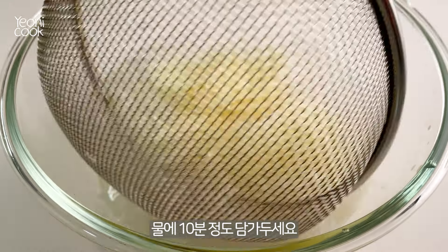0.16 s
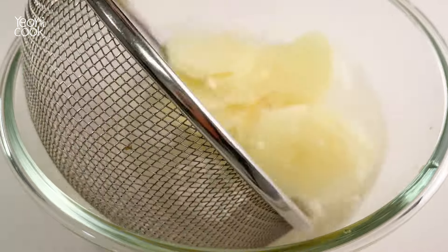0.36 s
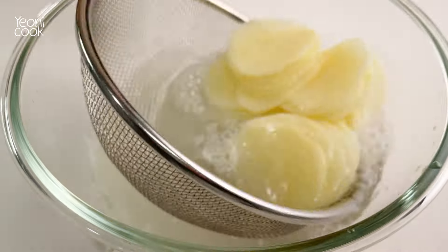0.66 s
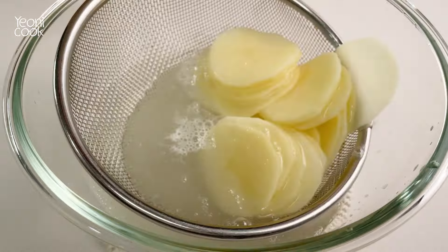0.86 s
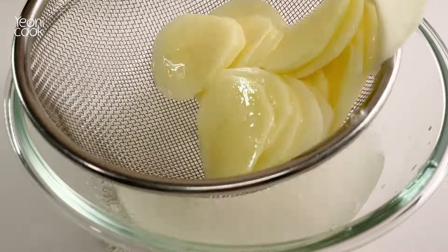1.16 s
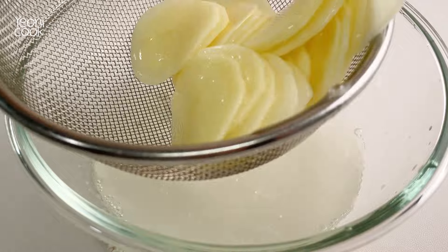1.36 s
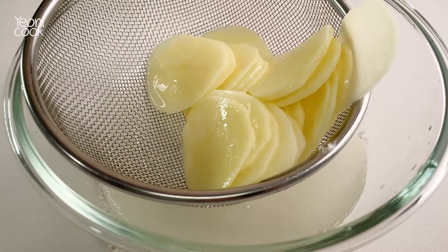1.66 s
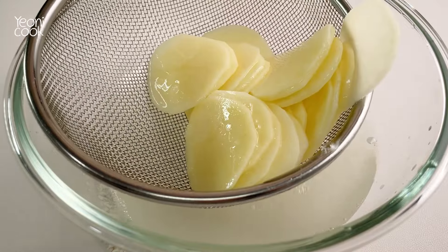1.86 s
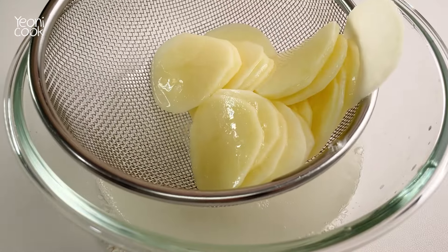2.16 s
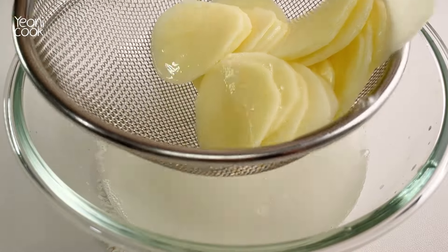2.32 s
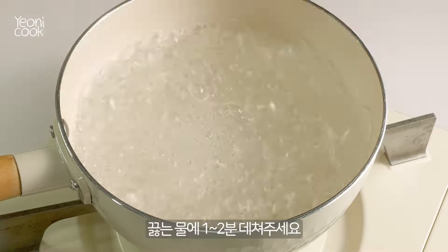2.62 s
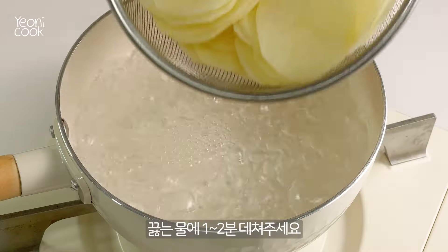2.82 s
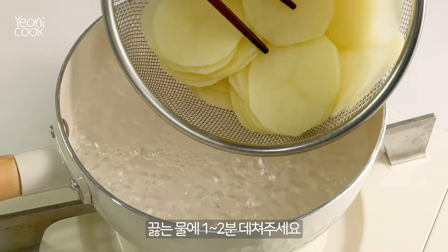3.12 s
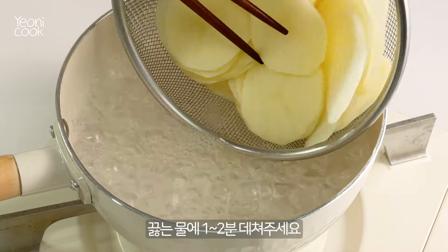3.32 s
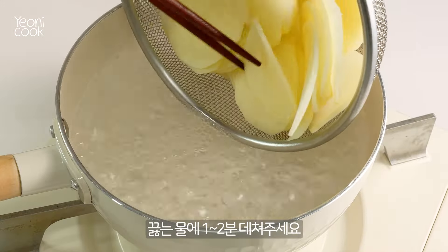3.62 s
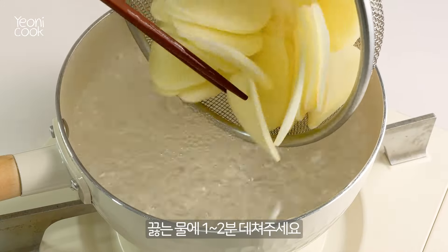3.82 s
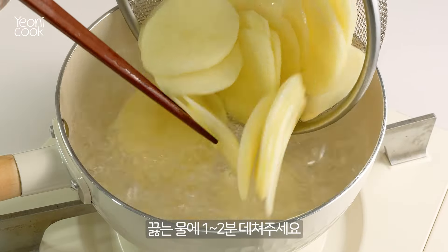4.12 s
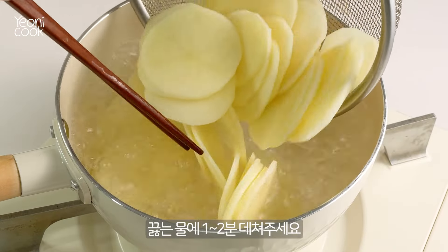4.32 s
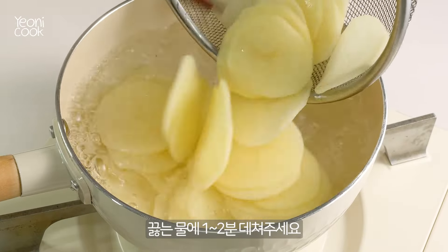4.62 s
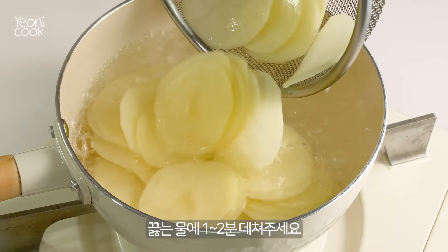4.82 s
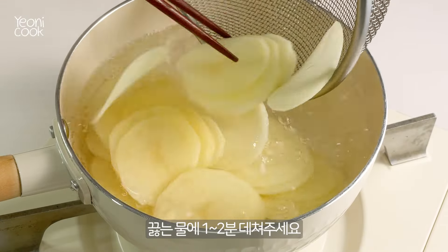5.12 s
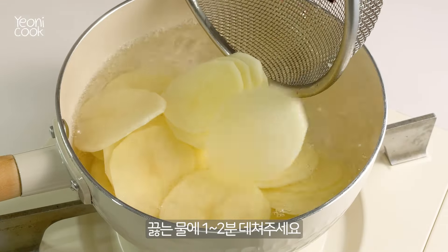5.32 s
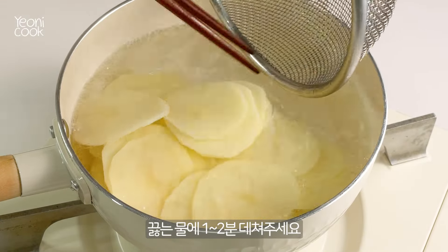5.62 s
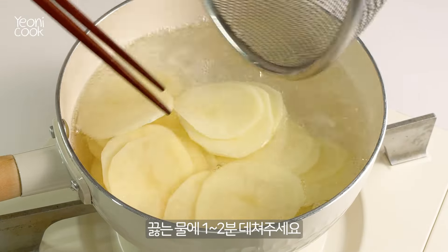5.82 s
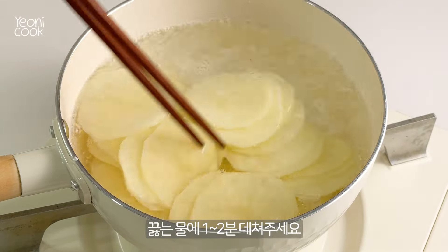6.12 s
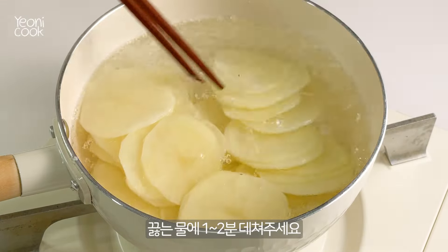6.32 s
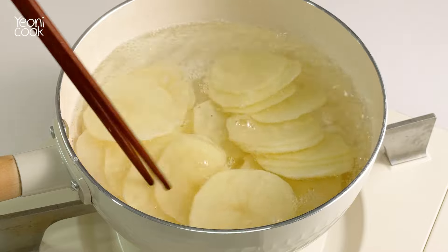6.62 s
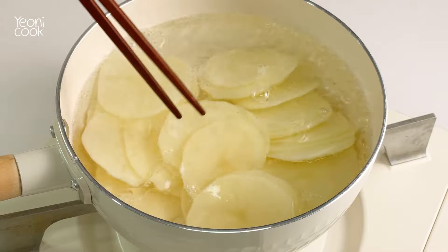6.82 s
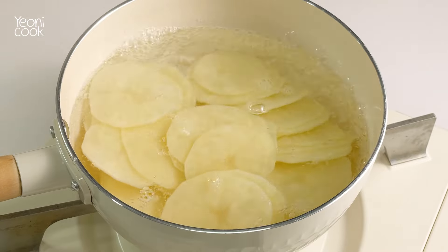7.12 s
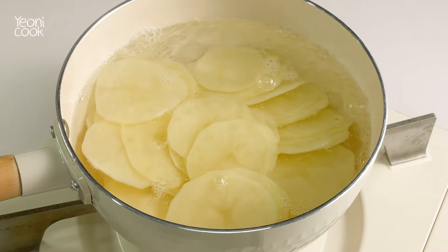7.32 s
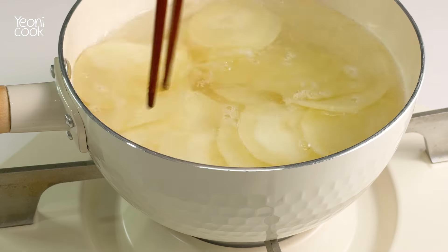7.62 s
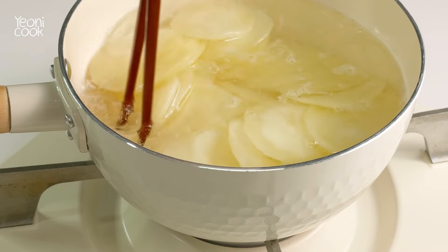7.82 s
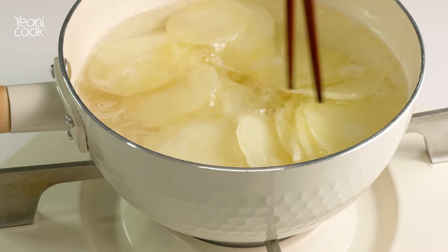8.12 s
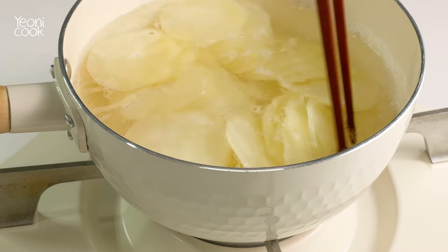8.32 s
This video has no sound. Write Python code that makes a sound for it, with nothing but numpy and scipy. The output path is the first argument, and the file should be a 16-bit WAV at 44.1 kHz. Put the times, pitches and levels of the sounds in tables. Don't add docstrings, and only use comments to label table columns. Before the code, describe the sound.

Water drips and drains from a wire strainer clinking on a glass bowl, then a cut to a pot bubbling softly over a hissing gas flame.

```python
import sys
import numpy as np
from scipy import signal
from scipy.fft import rfft, irfft, next_fast_len
from scipy.io import wavfile

SR = 44100
rng = np.random.default_rng(int(sys.argv[2]) if len(sys.argv) > 2 else 0)


def field_ratio(decibels):
    return 10 ** (np.asarray(decibels, dtype=float) / 20)


def to_wav(s):
    ch = np.atleast_2d(s).T
    pcm = np.round(np.clip(ch, -1, 1) * 32767)
    wavfile.write(sys.argv[1], SR, pcm.astype(np.int16))


N = 373086
T = np.arange(N) / SR
STOVE_FROM_S = 2.612

# time in seconds, spray level in dB.
DRAIN = [(0.0, -62), (0.116, -74), (0.28, -66), (0.285, -73), (0.515, -53), (0.53, -62), (0.716, -43),
         (0.855, -48.5), (0.899, -67.5), (1.03, -71), (1.04, -50.5), (1.31, -65.5), (1.32, -41.5),
         (1.478, -79), (1.61, -62), (1.81, -76), (2.15, -77), (2.61, -68.5)]
# start in seconds, rumble in dB, gurgle in dB, hold in seconds.
JOLTS = [
    (0.0, -47.5, -62.5, 0.092),
    (0.403, -65, -84, 0.12),
    (0.524, -34.5, -79.5, 0.0043),
    (0.706, -60.5, -82, 0.1),
    (1.041, -60.5, -41, .005),
    (1.312, -54, -69, .16),
    (1.605, -48, -44, .005),
    (2.365, -90, -75, .25),
]
# frequency in Hz, density in dB per Hz.
SPRAY_SPECTRUM = [(880, -42), (1500, -9.5), (4300, -9), (4850, -6.5), (10500, -5.5), (12100, 3),
                  (15700, -18.5), (16500, -48.5)]
# start in seconds, ring in dB, hardness in dB per octave, place on the rim
CLINKS = [
    (0.0, -48, -7.5, 1.04, 1.34),
    (0.5266, -18, -4.5, 1.83, 0.27),
    (1.0361, -15, 2.9, 1.01, 0.57),
    (1.406, -21, -7, 2.51, 1.08),
    (1.6064, -15.5, -3, 3.64, 0.67),
]
# level in dB, t60 in seconds, low edge in Hz, top edge in Hz.
CRACKS = [
    (-62, 0.045, 730, 9000),
    (-9.5, 0.023, 1670, 8900),
    (-7.5, 0.021, 1230, 14000),
    (-21, 0.035, 680, 17000),
    (-15.5, 0.04, 470, 14000),
]
# frequency in Hz, density in dB per Hz.
CRACK_SPECTRUM = [(180, -63), (300, -22), (3840, -7.5), (4770, -16.5), (5370, -8), (7380, -10),
                  (8160, -14.5), (12400, -9), (16500, -40.5)]
BOWL_HZ = [537, 1330, 2404, 2440, 3770, 3811, 5365, 5450, 7165, 9141, 9930, 10810, 11290, 12080, 13605]
BOWL_T60_S = [0.5, 0.53, 0.24, 0.11, 0.23, 0.12, 0.11, 0.09, 0.063, 0.091, 0.097, .07, 0.053, .06, .045]
BOWL_WAVES = np.array([2, 3, 4, 4, 5, 5, 6, 6, 7, 8, 2, 9, 3, 4, 10])
BOWL_DB = [-43.5, -33.5, -22, -24, -19, -7, 4.5, -8, 0.3, -1.5, -7.5, -5.5, 6, 0.5, 8.5]
BOWL_TURN_RAD = [2.34, .19, 0.85, 2.4, 0.87, 1.6, 1.03, 6, .27, .51, .98, 2.92, 1.68, 3.1, 2.4]
# start in seconds, level in
# dB, pitch in Hz, t60 in seconds.
KNOCKS = [(0.287, -35, 1510, 0.019), (0.293, -32.5, 1140, 0.014), (0.528, -21, 751, 0.02),
          (0.533, -22.5, 116, 0.093), (0.537, -25.5, 215, 0.049), (0.6402, -22, 1487, 0.041),
          (0.658, -59, 1316, 1), (1.039, -16.5, 1910, 0.014), (1.038, -37.5, 535, 0.06),
          (1.320, -14.5, 785, 0.025), (1.324, -12.5, 1480, 0.0041), (1.324, -28, 2495, 0.03),
          (1.326, -25, 4520, 0.015), (1.356, -16.5, 7590, .01), (1.609, -35.5, 525, 0.12),
          (1.608, -61.5, 1350, 0.061), (2.457, -34, 1057, 0.025), (2.457, -29.5, 2660, 0.019),
          (2.457, -37, 3460, 0.018), (2.457, -39.5, 4280, 0.022), (2.515, -42, 1810, 0.01),
          (2.791, -34, 3500, 0.01), (5.119, -39.5, 3380, 0.0097), (3.328, -38.5, 1510, 0.067),
          (7.456, -46.5, 1743, 0.042), (7.459, -50.5, 2840, 0.016), (1.607, -11.5, 3864, 0.028),
          (8.365, -37.5, 2200, 0.0079), (0.66, -64.5, 538, 1), (4.335, -42, 170, 0.078),
          (0.0, -53, 2434, .5), (1.61, -51, 62, 0.44), (2.458, -53.5, 125, 0.14), (0.42, -46, 48.2, 0.33),
          (0.62, -50, 130, .6), (1.037, -37.5, 5450, 0.28), (1.037, -41, 3811, 0.33),
          (1.406, -33.5, 5310, 0.15), (1.606, -48, 5320, 0.42), (1.608, -51, 2440, 0.46),
          (0.531, -37, 2355, 0.066), (0.755, -37, 2407, .08), (0.527, -26, 1390, 0.022),
          (0.527, -18, 3700, .015), (0.527, -16, 4280, .015), (0.527, -14.5, 5840, 0.017),
          (0.527, -18, 6820, .015), (1.607, -17, 13560, .07), (4.395, -55, 571, .3), (6.8, -58, 560, .3)]
# start in seconds, peak in dB, pitch in Hz, cycles of
DRIPS = [(0.0678, -29, 4660, 13), (0.0758, -40, 2640, 20), (0.1053, -33.5, 3540, 15),
         (0.2914, -20.5, 2130, 6.3), (0.3323, -35.5, 6900, 13), (0.4239, -40.5, 3350, 49),
         (0.454, -38, 5630, 13), (0.588, -36, 2930, 25), (0.6419, -25.5, 1706, 5.3),
         (0.7173, -23, 2540, 29), (0.749, -30, 1970, 37), (0.7605, -25, 2390, 5.3),
         (0.7952, -24.5, 4230, 20), (1.1719, -22.5, 2800, 17), (1.2665, -24.5, 8090, 55),
         (1.8074, -49, 3750, 11), (1.8277, -47.5, 3774, 8), (2.374, -42, 2000, 11),
         (2.3914, -38.5, 1850, 5), (2.463, -31.5, 6570, 15), (2.4992, -31, 3370, 8.1),
         (0.5703, -36, 3280, 10), (0.669, -41, 1430, 13), (0.691, -36, 1410, 17), (0.699, -34, 3710, 15),
         (0.735, -28, 2070, 31), (0.775, -30, 2540, 23), (0.8352, -34, 4350, 15), (0.85, -36, 1650, 20),
         (1.864, -52, 6500, 8.3), (1.1157, -12, 14000, 32), (0.641, -26, 9000, 3), (8.364, -52, 3200, 3),
         (2.169, -51.5, 2200, 6), (2.262, -54, 3000, 10), (2.605, -50, 2000, 6), (1.489, -46, 4500, 20)]
# start in seconds, peak in dB.
TICKS = [(0.2169, -39), (0.3965, -42), (0.4374, -33), (0.6025, -19.5), (0.814, -24.5), (0.9208, -38.5),
         (0.9314, -45.5), (1.1837, -11.5), (1.251, -41), (1.3551, -5.5), (1.4885, -32), (1.508, -34.5),
         (2.278, -48.5), (2.314, -42.5), (2.3401, -49), (2.361, -40), (2.411, -35), (2.4577, -15),
         (2.473, -26.5), (2.5044, -33), (2.548, -50), (2.577, -46), (2.5835, -44), (0.0775, -42),
         (0.1225, -49), (0.371, -48.5), (1.558, -48), (1.565, -53), (1.68, -39), (1.737, -42),
         (1.946, -55.5)]
# start in
# seconds, peak in dB, pitch in Hz, cycles of ring.
POPS = [(2.6445, -33.5, 2130, 14), (2.7906, -45, 1730, 14), (2.8417, -36, 2000, 25),
        (3.1554, -34, 1470, 18), (3.2165, -32.5, 2280, 13), (3.33, -26, 2080, 42), (3.3504, -32, 1790, 36),
        (3.431, -32.5, 1820, 38), (3.4948, -39, 2330, 22), (3.519, -31, 2320, 30), (3.7193, -34, 1840, 19),
        (3.7528, -33, 1480, 12), (3.8467, -35, 2650, 29), (4.0436, -38, 3600, 19),
        (4.086, -30.5, 6500, 3.5), (4.1644, -6.5, 12700, 71), (4.2517, -33, 1970, 4),
        (7.4588, -38.5, 1270, 16), (2.6672, -34, 2080, 18), (2.8593, -40, 1910, 15),
        (2.9062, -42, 1640, 15), (2.972, -38, 2640, 18), (2.9915, -40, 1640, 17), (3.014, -35, 2230, 14),
        (3.0718, -39, 1620, 15), (3.1257, -40, 2190, 12), (3.3986, -35, 2190, 20), (3.5757, -39, 2230, 15),
        (3.6111, -38, 2290, 15), (3.6749, -40, 2260, 10), (3.7797, -36, 1610, 15), (3.8176, -39, 1600, 13),
        (3.9089, -39, 2060, 15), (3.9663, -35.5, 2060, 13), (4.1249, -42, 1960, 11),
        (4.2292, -40, 2350, 13), (7.46, -43, 3020, 5), (7.477, -42.5, 1800, 25), (7.49, -48, 1350, 25),
        (7.718, -45, 2900, 8), (8.38, -47.5, 2100, 25)]
# start in seconds, peak in dB.
SPITS = [(3.5354, -31), (4.1734, -25), (4.1984, -23), (4.5067, -33), (4.5414, -20), (4.5476, -16),
         (4.5634, -20), (4.6508, -28), (4.6803, -28), (4.8564, -29), (4.9955, -30.5), (5.0424, -33),
         (5.0534, -20), (5.0684, -26), (5.0764, -31), (5.1194, -30), (5.1637, -36), (5.3487, -30),
         (5.4505, -29.5), (6.4348, -30), (8.3639, -37)]
# start in seconds, length in seconds, tail t60 in seconds, level in dB,
# low edge in Hz.
SPLASHES = [(1.019, .0075, .02, -49.5, 2970), (1.12, 0.026, 0.043, -42.5, 2980),
            (1.297, 0.0049, .017, -49, 2500), (1.321, 0.0097, 0.0091, -23.5, 3274),
            (1.329, .005, 0.55, -43.5, 4950), (1.404, 0.049, 0.018, -33.5, 2270),
            (2.169, .01, .15, -58, 6140), (2.36, 0.15, .06, -63, 1505), (4.161, .0031, 0.13, -38, 10400),
            (4.538, 0.04, .06, -47, 6100), (4.59, 0.0059, .018, -40, 4970), (4.81, 0.017, 0.29, -45, 3500),
            (5.029, 0.051, 0.13, -34, 4850), (6.103, 0.057, 0.082, -56.5, 4300),
            (6.99, 0.12, .05, -58, 2500), (0.569, .005, .02, -42, 5000), (0.609, .003, .015, -43, 8500),
            (0.632, 0.0088, .02, -42, 5000), (0.668, 0.01, .03, -44, 3000), (0.727, 0.013, .03, -44, 2956),
            (0.748, .036, .02, -40, 2500), (0.794, 0.0053, .015, -41, 1800),
            (0.813, 0.045, .03, -39.5, 1800), (0.884, 0.0036, .03, -52, 8020),
            (0.424, .005, .03, -49.5, 3000), (0.446, 0.039, .05, -61.5, 5030),
            (1.354, .006, .015, -30.5, 5470), (3.107, 0.0027, .01, -57, 4200),
            (3.127, .004, .01, -51, 3500), (3.578, 0.0034, .01, -54, 3000), (0.19, 0.086, .05, -64.5, 2300),
            (7.459, 0.0028, .1, -60, 1000), (2.458, .004, .06, -50, 1000), (4.072, 0.051, .06, -52, 4000),
            (4.17, 0.039, .06, -50.5, 4000), (1.33, .06, .03, -44.5, 6000), (8.365, .003, .1, -59.5, 1500)]
# time in seconds, vigour in dB.
VIGOUR = [
    (2.61, -3),
    (2.81, -1),
    (3.29, 0),
    (4.6, -4),
    (7.02, -22),
    (7.41, -39),
    (7.412, -18.5),
    (7.94, -23),
    (8.46, -23.5),
]
# start in seconds, length in seconds, extra dB for large bubbles,
# extra dB for small ones.
SURGES = [(2.637, 0.068, 9, 3), (2.775, 0.047, 4, 5), (2.827, 0.052, 8, -13), (2.985, 0.055, 5.5, -1),
          (3.154, 0.045, 4, 0), (3.213, 0.061, 10, 4.5), (3.32, 0.054, 9, -19), (3.423, 0.071, 8, -12),
          (3.496, 0.03, 1, -3), (3.736, 0.083, 10, -3.5), (4.1, 0.042, 12.5, 7), (6.264, 0.17, 8, 8),
          (6.817, 0.21, 11, 9), (7.03, 0.032, -17.5, 5.5), (7.322, 0.1, -5, 16)]
# frequency in Hz, density in dB per Hz.
FIZZ_SPECTRUM = [(1470, -41), (2500, -8.5), (3510, -8.5), (3860, -14), (6650, -2.5), (10200, 5),
                 (11800, 9.5), (15100, -4), (16100, -36), (16500, -48)]
# frequency in Hz, density in dB per Hz.
FLAME_SPECTRUM = [(41, -8), (70, 9), (445, 2), (835, -34), (1090, 2.5), (1310, -9), (1810, -0.5),
                  (2210, -22), (2710, -8), (9000, -19), (11700, -83), (19800, -120)]
# pitch in Hz, bandwidth in Hz, level in dB.
JETS = [(116, 7.2, -77.5), (153.2, 15, -75), (1015, 150, -69), (1790, 190, -79), (4520, 150, -81),
        (7150, 90, -88), (11970, 1700, -58), (3700, 120, -82.5), (1112, 34, -76.5)]
# start in seconds, level in dB, slip spacing in seconds.
CREAKS = [
    (4.332, -37.5, 0.0108),
    (6.75, -44.5, .0109),
]
SLIP_DB = [-2, 0, -2, -4]
# frequency in Hz, level in dB, t60 in seconds.
JOINT = [(461, 5.5, 0.043), (600, 8.5, 0.021), (1072, 3.5, 0.052), (667, -16, 0.01), (571, -14, 0.29),
         (880, -1, .03)]
# frequency in Hz, density in dB per Hz.
QUIET_SPECTRUM = [(18, -54), (30, -24), (190, -4), (229, -9.5), (332, -16), (533, -10), (928, -19),
                  (12700, -39.5), (16500, -43)]


def rms_one(x):
    return x / np.sqrt(np.mean(x ** 2) + 1e-20)


def in_time(rows):
    s, *columns = np.transpose(rows)
    return [np.interp(T, s, c) for c in columns]


def drift(rate):
    r = np.exp(-80 * np.pi * rate / SR)
    noise = rng.standard_normal(N // 40 + 2002)
    slow = signal.lfilter([1], [1, -2 * r, r * r], noise)[2000:]
    return np.interp(np.arange(N) / 40, np.arange(len(slow)), rms_one(slow))


def ring(clicks, hz, t60):
    r, w = field_ratio(-60 / (t60 * SR)), 2 * np.pi * hz / SR
    return signal.lfilter([0, np.sin(w)], [1, -2 * r * np.cos(w), r * r], clicks + 1e-18)


def colour(x, spectrum):
    hz, db = np.transpose(spectrum)
    size = next_fast_len(len(x))
    grid = np.fft.rfftfreq(size, 1 / SR) + 1
    gain = field_ratio(np.interp(np.log(grid), np.log(hz), db))
    return rms_one(irfft(rfft(x, size) * gain, size)[:len(x)])


def high(x, hz, order=3):
    return signal.sosfilt(signal.butter(order, hz, "high", fs=SR, output="sos"), x)


def low(x, hz):
    return signal.sosfilt(signal.butter(2, min(hz, .45 * SR), fs=SR, output="sos"), x)


def add(out, s, piece):
    i = round(s * SR)
    out[i:i + len(piece)] += piece[:N - i]


def grains(per_s, spread_db, size=N):
    sizes = field_ratio(spread_db * np.minimum(rng.exponential(1, size), 5))
    signs = rng.choice([-1, 1], size)
    return sizes * signs * (rng.random(size) < per_s / SR)


def bubbles(per_s, low_hz, high_hz, cycles, spread_db, clump_db, count=14):
    born = grains(per_s * field_ratio(clump_db * drift(19)), spread_db)
    dealt = rng.integers(0, count, N)
    pitches = np.geomspace(low_hz, high_hz, count)
    return rms_one(sum(ring(born * (dealt == k), hz, cycles / hz) for k, hz in enumerate(pitches)))


def fizz(per_s, spread_db, smooth, spectrum):
    crackle = bubbles(per_s, 2600, 14000, 4.2, spread_db, clump_db=4.5, count=7)
    return colour(crackle + smooth * rng.standard_normal(N), spectrum)


def jolted(column, fall_db_per_s):
    total = np.zeros(N)
    for row in JOLTS:
        start, hold = row[0], row[3]
        total += field_ratio(row[column] - fall_db_per_s * np.maximum(T - start - hold, 0)) * (T >= start)
    return total


def slosh():
    spray_db, = in_time(DRAIN)
    shake = jolted(1, fall_db_per_s=152) + field_ratio(-79.5)
    drain_gurgle_db = -48 + 2.2 * (spray_db + 39)
    gurgle = jolted(2, fall_db_per_s=122) + field_ratio(drain_gurgle_db)
    hand = [(30, -22), (48, 1.5), (95, -13.5), (125, 4), (200, -11.0), (300, -31.0)]   # Hz, dB per Hz
    rumble = field_ratio(-2.5) * shake * colour(rng.standard_normal(N), hand)
    gurgling = field_ratio(-5.0) * gurgle * bubbles(900, 1300, 4900, 24, 1.6, clump_db=4)
    spray = field_ratio(spray_db - 2.5) * fizz(5000, 5, 0.83, SPRAY_SPECTRUM)
    return (rumble + gurgling + spray) * (T < STOVE_FROM_S)


def clinks():
    out, click, t = np.zeros(N), np.eye(1, SR // 2)[0], T[:SR // 2]
    contact = np.minimum(t / 0.0014, 1)
    hz_all = np.array(BOWL_HZ)
    signs = (-1) ** np.arange(len(hz_all))
    next_starts = [row[0] for row in CLINKS[1:]] + [9]
    for row, (crack_db, crack_t60, edge_hz, top_hz), next_s in zip(CLINKS, CRACKS, next_starts):
        s, db, hardness_db, place, share = row
        reach = np.abs(np.cos(np.array(BOWL_WAVES) * place - np.array(BOWL_TURN_RAD))) + .06
        drive = signs * reach * field_ratio(db + np.array(BOWL_DB) + hardness_db * np.log2(hz_all / 4000))
        modes = np.zeros(len(t))
        for hz, gain, full_t60 in zip(BOWL_HZ, drive, BOWL_T60_S):
            t60 = share * full_t60
            after = field_ratio(-25) / (1 + (hz / 6500) ** 4)
            modes += gain * (ring(click, hz, t60) + after * ring(click, hz, 3.3 * t60))
        stilled = field_ratio(-60 * np.maximum(s + t - next_s, 0) / .05)
        add(out, s, contact * modes * stilled)
        crack = colour(rng.standard_normal(4096), CRACK_SPECTRUM)
        crack = crack * field_ratio(crack_db - 60 * T[:4096] / crack_t60) * contact[:4096]
        add(out, s, low(high(crack, edge_hz, order=5), top_hz))
    return out


def knocks():
    out, click, t = np.zeros(N), np.eye(1, SR // 2)[0], T[:SR // 2]
    for s, db, hz, t60 in KNOCKS:
        noise = rng.standard_normal(SR // 2)
        puff = rms_one(high(ring(noise, hz, 3.3 / hz), 1.5 * hz))
        puff = puff * field_ratio(-4.5 - 60 * t / min(0.36 * t60, .05))
        swing_up = np.minimum(hz * t / 1.7, 1)
        add(out, s, field_ratio(db) * (ring(click, hz, t60) + puff) * swing_up)
    return out


def trapped(rows):
    return [(*row, 1 - 0.4593 * row[3]) for row in rows]


def films(rows):
    pitched = []
    for s, db in rows:
        hz = 11850 * (1 + 0.048 * rng.standard_normal())
        pitched.append((s, db, hz, 44, -17 - 0.38 * db))
    return pitched


def drops(rows):
    out, t = np.zeros(N), T[:1024]
    for s, db, hz, cycles, snap_db in rows:
        turns = hz * t
        t60 = max(cycles, 1.5) / hz + 0.0037
        swing = field_ratio(-60 * t / t60) * (1 - np.exp(-turns / 0.6))
        bubble = np.sin(2 * np.pi * turns * (1 + 0.00084 * turns)) * swing / swing.max()
        noise = high(colour(rng.standard_normal(1024), SPRAY_SPECTRUM), 0.25 * hz)
        snap = field_ratio(snap_db - 1.5 - 60 * t / 0.013) * noise
        add(out, s, field_ratio(db - 7.0) * (bubble + snap))
    return out


def splashes():
    out, t = np.zeros(N), T[:8192]
    for s, length, t60, db, edge_hz in SPLASHES:
        crackle = rms_one(grains(5000, 3.8, size=8192)) + 0.4 * rng.standard_normal(8192)
        swell = np.minimum(t / min(0.42 * length, .004), 1)
        fall = field_ratio(db - 60 * np.maximum(t - length, 0) / t60)
        add(out, s, swell * fall * high(colour(crackle, SPRAY_SPECTRUM), edge_hz, order=6))
    return out


def rubbed_bowl(rub):
    rub = rub[:3 * SR] * (T[:3 * SR] < STOVE_FROM_S)
    sung = sum(ring(rub, hz, 0.36 * t60) for hz, t60 in zip(BOWL_HZ[2:9], BOWL_T60_S[2:9]))
    return field_ratio(-46.0) * np.pad(sung, (0, N - 3 * SR))


def boil_state():
    vigour_db, = in_time(VIGOUR)
    calm_db = np.minimum(vigour_db + 5.5, 0)
    beside = T > 7.411
    return vigour_db, calm_db, beside


def boiling():
    vigour_db, calm_db, beside = boil_state()
    large_db = -58 + vigour_db
    small_db = -61.5 + 0.27 * calm_db - 21 * beside
    for s, length, more_large_db, more_small_db in SURGES:
        surge = np.interp(T, [s - .008, s, s + length, s + length + 0.021], [0.026, 0.53, 0.48, 0.017])
        large_db = large_db + more_large_db * surge
        small_db = small_db + more_small_db * surge
    large = field_ratio(large_db - 0.5) * low(bubbles(600, 1586, 2490, 27, 0.66, clump_db=3.0), 5180)
    small = field_ratio(small_db) * bubbles(1500, 2640, 5110, 14.0, 1.7, clump_db=3.0)
    return large + small


def flame():
    return field_ratio(-62.5 - 6.0 + 0.58 * drift(24)) * colour(rng.standard_normal(N), FLAME_SPECTRUM)


def narrow(hz, width_hz, db):
    return field_ratio(db) * rms_one(ring(rng.standard_normal(N), hz, 4.2 / width_hz))


def fan():
    level = field_ratio(-63.5 + 2.1 * drift(2.7))
    phase = 2 * np.pi * np.cumsum(59.4 + 0.49 * drift(2.6)) / SR
    return level * np.sin(phase)


def pot_fizz():
    _, calm_db, beside = boil_state()
    fizz_db = -55 + .19 * calm_db - 3 * beside
    return field_ratio(fizz_db - 2.5) * fizz(2500, 5.3, 1.03, FIZZ_SPECTRUM)


def stove():
    burning = boiling() + flame()
    whistles = sum(narrow(*jet) for jet in JETS)
    return (burning + whistles + fan() + pot_fizz()) * (T >= STOVE_FROM_S)


def creaks():
    slips = np.zeros(N)
    for s, db, spacing in CREAKS:
        for k, slip_db in enumerate(SLIP_DB):
            add(slips, s + k * spacing, field_ratio(db + slip_db) * np.hanning(36) / 18)
        rub = rng.standard_normal(2000) * np.hanning(2000)
        add(slips, s, field_ratio(db - 37.0) * rub)
    return sum(field_ratio(db) * ring(slips, hz, t60) for hz, db, t60 in JOINT)


def kitchen(x):
    t = T[:SR // 2]
    tail = rng.standard_normal(len(t)) * field_ratio(-60 * t / 0.28) * (t > .004)
    tail = signal.sosfilt(signal.butter(1, 2200, fs=SR, output="sos"), tail)
    return signal.fftconvolve(x, tail / np.sqrt(np.sum(tail ** 2)))[:N]


def scene():
    water, tearing = slosh(), splashes()
    struck = clinks() + knocks()
    small_sounds = drops(trapped(DRIPS + POPS) + films(TICKS + SPITS))
    near = struck + small_sounds + tearing
    far = low(low(high(creaks(), 367, order=6), 1450), 1450)
    floor = field_ratio(-73 - 2.5) * colour(rng.standard_normal(N), QUIET_SPECTRUM)
    echoes = field_ratio(-17.5) * kitchen(near + field_ratio(-5) * far)
    singing = rubbed_bowl(water + field_ratio(-0.5) * tearing)
    return (near + far + echoes + water + singing + stove() + floor)[None]


def roll_off(x):
    return signal.sosfilt(signal.butter(12, 16650, fs=SR, output="sos"), x)


def record(dry):
    peak_limit = .8
    rounded = peak_limit * np.tanh(dry / peak_limit)
    steep = signal.cheby2(10, 45, 16500, fs=SR, output="sos")
    mix = signal.sosfilt(steep, rounded)
    return roll_off(mix)


dry = scene()
out = record(dry)
to_wav(out)
```